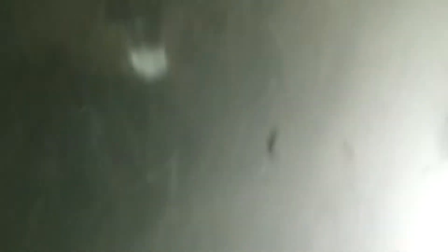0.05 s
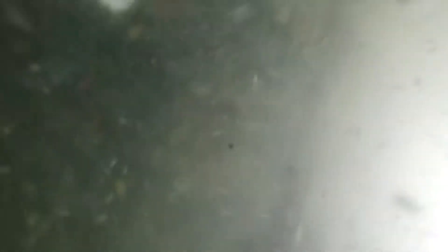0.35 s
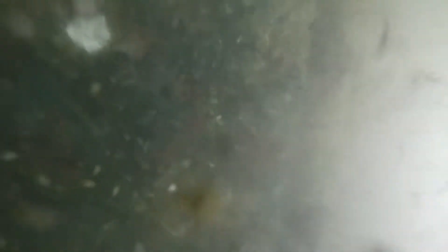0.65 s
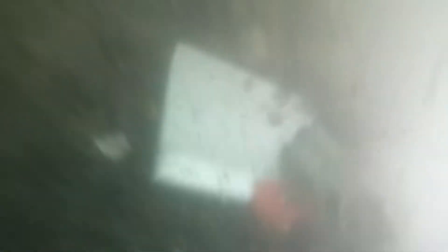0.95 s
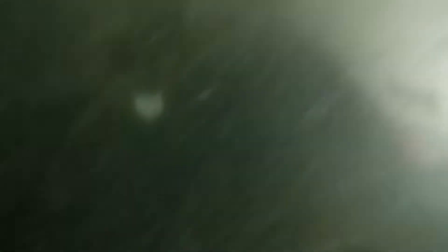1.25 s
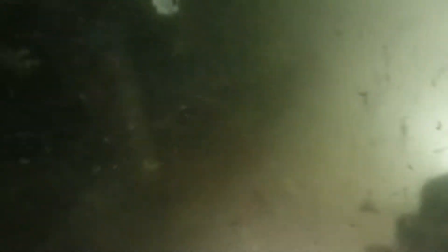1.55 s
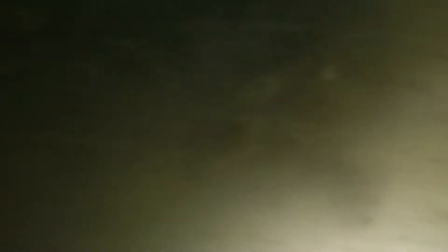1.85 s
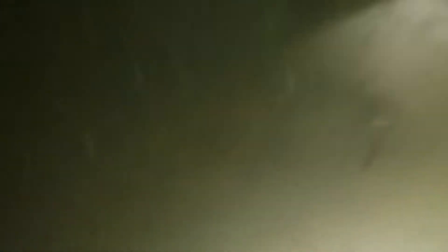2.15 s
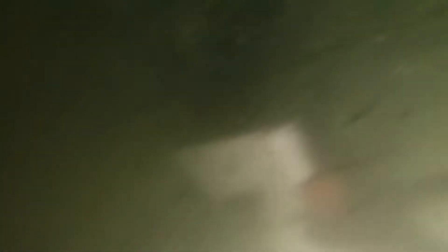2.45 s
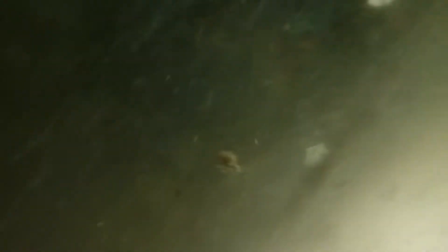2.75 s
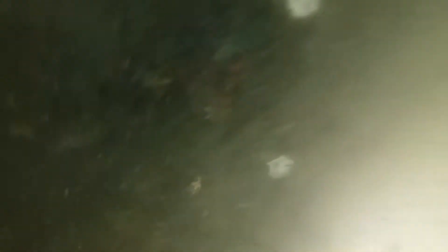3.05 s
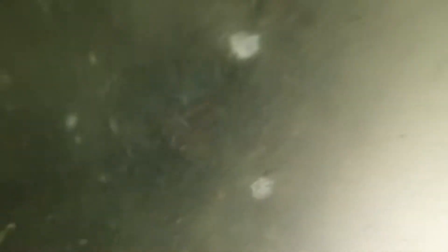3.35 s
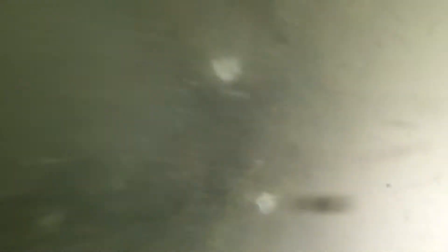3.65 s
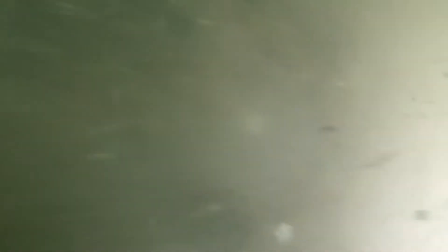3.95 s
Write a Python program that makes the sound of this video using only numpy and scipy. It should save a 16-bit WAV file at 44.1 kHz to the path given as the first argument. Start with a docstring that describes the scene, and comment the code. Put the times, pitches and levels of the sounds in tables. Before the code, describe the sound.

A scraper is pushed over a fouled boat hull underwater, close by, over continuous low churning and booming air pockets. From about 0.4 to 1 second the blade rasps and judders, snapping off shells with bright crackles. Loud hollow knocks ring the hull, thickest from 1.8 to 2.2 seconds. Weaker scrapes follow near 2.4 and 3.5 seconds, the last with a knock and a surge of water.

```python
"""Under water, a scraper is pushed over a fouled boat hull, close to a camera in a housing.
From the start water churns, air pockets boom and the hull judders. In the first second the blade
sticks and slips, rasping and cracking off shell growth. Knocks then ring the hull's modes, thickest
around 2 s, and two weaker strokes follow near 2.4 s and 3.5 s, the last with a surge of water.
Throughout, a limiter holds down the loudest blows."""
import sys
import numpy as np
from scipy import signal
from scipy.io import wavfile
from scipy.ndimage import uniform_filter1d, minimum_filter1d

SR = 44100
rng = np.random.default_rng(int(sys.argv[2]) if len(sys.argv) > 2 else 0)


def store_pcm(level_fs):
    """Save levels as 16-bit WAV."""
    pcm = np.round(np.clip(level_fs, -1, 1) * 32767).astype(np.int16)
    wavfile.write(sys.argv[1], SR, np.atleast_2d(pcm).T)


N = 176400
TIME = np.arange(N) / SR


def amp(db):
    """Decibels to amplitude ratio."""
    return 10 ** (np.asarray(db) / 20)


def unit(x):
    """Normalisation to rms 1."""
    return x / np.sqrt(np.mean(x ** 2) + 1e-20)


def add(mix, start_s, sound):
    """Superposition: a sound joins the mix at its start time."""
    part = mix[max(round(start_s * SR), 0):][:len(sound)]
    part += sound[:len(part)]


def level(rows, before_db=None):
    """Amplitude envelope, linear in decibels between points."""
    time_s, level_db = np.transpose(rows)
    return amp(np.interp(TIME, time_s, level_db, left=before_db))


def ring(spectrum, size=8192):
    """Minimum-phase impulse response: the Hilbert transform of log gain gives the phase."""
    hz, db = np.transpose(spectrum)
    bin_hz = abs(np.fft.fftfreq(size, 1 / SR)) + 1
    log_gain = np.log(amp(np.interp(np.log(bin_hz), np.log(hz), db)))
    response = np.fft.ifft(np.exp(np.conj(signal.hilbert(log_gain)))).real
    return response[:size // 2] * np.hanning(size)[size // 2:]


def through(x, response):
    """Convolution, cut to the scene's length."""
    return signal.fftconvolve(x, response)[:N]


def steady(x, span_s):
    """Division by the running rms evens the level and leaves faster detail."""
    window = signal.windows.hann(max(int(span_s * SR), 8))
    power = signal.fftconvolve(x ** 2, window, "same") / signal.fftconvolve(np.ones(N), window, "same")
    return x / np.sqrt(abs(power) + 1e-6 * np.mean(x ** 2))


def grains(per_s, spread_db):
    """Poisson process: independent impulses of random sign and size."""
    size = amp(spread_db * np.minimum(rng.exponential(1, N), 4))
    return size * rng.choice([-1., 1.], N) * (rng.random(N) < per_s / SR)


def scatter(x, wet_db, t60):
    """Reverberation: direct sound plus exponentially decaying reflections."""
    t = TIME[:SR // 4]
    tail = rng.standard_normal(len(t)) * amp(-60 * t / t60)
    return x + amp(wet_db) * through(x, tail / np.linalg.norm(tail))


def bubble(hz, db, t60, attack_s=0.00067, rise_per_s=0.46):
    """Bubble resonance: air is the spring and water the mass; the damped tone rises in pitch."""
    t = TIME[:SR // 3]
    envelope = 2 * amp(db - 60 * t / t60) * (1 - np.exp(-t / attack_s))
    return envelope * np.sin(2 * np.pi * hz * (t + rise_per_s * t ** 2 / 2))


def churn():
    """Shot noise: random gulps of churned water overlap into a low rumble."""
    # strength of the churning: time_s, level_db
    churning = [(0.01, -14.5), (0.09, -14), (0.36, -18), (0.4, -12.5), (0.96, -14.5), (0.98, -6.5),
                (1.05, -23.5), (1.14, -27), (1.17, -21), (1.31, -29), (1.36, -20.5), (1.53, -38),
                (1.71, -6.5), (1.98, -15), (2.14, -15.5), (2.65, -13.5), (2.81, -12.5), (3.14, -23),
                (3.47, -21), (3.51, -16), (3.77, -29), (3.99, -18)]
    # spectrum of one gulp: frequency_hz, gain_db
    spectrum = [(30, -17), (60, -10), (90, -3.5), (120, 2), (150, -0.5), (200, -6), (280, -23), (450, -43),
                (900, -89), (6000, -130)]
    gulps = through(grains(per_s=130, spread_db=-0.5), ring(spectrum))
    return amp(0.5) * level(churning) * steady(gulps, span_s=0.048)


def surge():
    """Flow noise: moving water puts slow pressure fluctuations on the housing."""
    # push of the water: time_s, level_db
    push = [(0.01, -31), (0.81, -27), (0.94, -20.5), (1.02, -36), (2.5, -30), (2.88, -40), (3.56, -30.5),
            (3.63, -18), (3.78, -27), (3.99, -18.5)]
    # pressure spectrum: frequency_hz, gain_db
    spectrum = [(3, -22), (10, 1), (22, -5.5), (48, 4.5), (70, -6), (130, -9), (400, -71), (4000, -130)]
    pressure = through(rng.standard_normal(N), ring(spectrum, size=32768))
    return amp(5) * level(push) * steady(pressure, span_s=0.095)


def background():
    """Amplitude-modulated noise: a rumble swells at random under a faint hiss."""
    # spectrum of the rumble: frequency_hz, gain_db
    rumble_spectrum = [(30, -8.5), (130, 11.5), (300, -22), (550, -21.5), (800, -43), (1400, -56),
                       (4000, -71.5)]
    # spectrum of the hiss: frequency_hz, gain_db
    hiss_spectrum = [(300, -4.5), (800, -0.5), (1400, -5.5), (2200, -7.5), (3000, -16), (4300, -16),
                     (5600, -12), (7000, -17), (8200, -12.5), (9200, -9.5), (10500, -16), (12500, -13.5),
                     (14000, -37)]
    # strength of the hiss: time_s, level_db
    hiss_levels = [(0, -9.5), (0.3, -3.5), (1.1, -6.5), (1.6, -3.5), (1.78, -4), (1.83, -8), (2.18, -8.5),
                   (2.24, -13.5), (2.35, -10), (2.6, -10.5), (2.85, -16.5), (3.2, -5), (3.7, -4), (4, -1)]
    swell_db = 3.5 * unit(through(rng.standard_normal(N), np.hanning(int(0.12 * SR))))
    rumble = unit(through(rng.standard_normal(N), ring(rumble_spectrum)) * amp(swell_db))
    hiss = unit(through(rng.standard_normal(N), ring(hiss_spectrum)))
    return amp(-34.5) * rumble + amp(-60) * level(hiss_levels) * hiss


def judder():
    """Forced vibration: uneven shoves of the blade make the hull thrum."""
    # strength of the juddering: time_s, level_db
    juddering = [(0, -24.5), (0.33, -29.5), (0.45, -21.5), (0.58, -16.5), (0.64, -24), (0.715, -12.5),
                 (0.82, -28.5), (0.975, -14), (1.07, -43), (1.25, -37), (1.31, -42), (1.365, -26),
                 (1.42, -42), (1.6, -34.5), (1.71, -24), (1.78, -18), (1.83, -18), (1.88, -12), (1.95, -14),
                 (2.03, -26.5), (2.08, -33), (2.11, -24.5), (2.21, -18.5), (2.26, -25.5), (2.37, -27),
                 (2.42, -19), (2.48, -36), (2.63, -19), (2.71, -36.5), (2.9, -28.5), (3.15, -38),
                 (3.42, -35), (3.53, -23.5), (3.6, -37), (3.8, -47.5), (3.89, -25.5), (4, -46)]
    # response of the hull: frequency_hz, gain_db
    hull = [(90, -29.5), (170, -9.5), (240, 7), (315, -1.5), (390, -7.5), (490, -13), (540, -25),
            (680, -26.5), (800, -56.5), (1300, -54.5), (2500, -83), (9000, -125)]
    shoves = scatter(grains(per_s=190, spread_db=-0.5), wet_db=-9, t60=0.45)
    return amp(1) * level(juddering) * steady(through(shoves, ring(hull)), span_s=0.076)


def gurgle():
    """Resonance in a random swarm of tiny bubbles: the smaller ring higher, shorter and weaker."""
    # strength of the swarm: time_s, level_db
    gurgling = [(0, -41), (0.25, -48), (0.45, -43), (0.56, -32), (0.66, -39), (0.9, -47), (1.1, -62),
                (1.75, -58), (1.9, -39), (2.03, -58), (2.3, -53), (2.6, -46), (2.75, -56), (2.95, -51),
                (3.15, -60), (3.52, -43), (3.6, -58), (3.65, -49), (3.78, -68), (3.9, -44), (4, -45)]
    low_hz, high_hz, db_per_octave, decay_cycles = 460, 720, -9, 18
    swarm = np.zeros(N)
    for hz in np.geomspace(low_hz, high_hz, num=16):
        blip = bubble(hz, db_per_octave * np.log2(hz / low_hz), t60=decay_cycles / hz)
        swarm += through(grains(per_s=40, spread_db=7.5), blip)
    return level(gurgling) * steady(swarm, span_s=0.45)


def booms():
    """Volume pulsation: large air pockets resonate at low pitch."""
    # air pockets: start_s, pitch_hz, level_db
    pockets = [(0.03, 129.8, -9), (0.392, 117, -7), (0.706, 150, -6.5), (0.922, 84, -10.5),
               (1.16, 102, -12.5), (1.627, 219, -12.5), (1.655, 171, -9.5), (1.692, 119, -0.5),
               (1.71, 298, -15.5), (1.782, 105, -6.5), (1.98, 73.7, -9), (2.04, 69.3, -4),
               (2.096, 105.5, -8.5), (2.133, 136.7, -6.5), (2.179, 95.4, -4), (2.243, 83.5, -2.5),
               (2.325, 107.7, -5.5), (2.417, 111.6, -11.5), (2.72, 147.4, -6.5), (2.788, 131.9, -3.5),
               (2.884, 131.4, -5.5), (3, 121.5, -10.5), (3.944, 56.2, -12)]
    out = np.zeros(N)
    for start_s, hz, db in pockets:
        add(out, start_s, bubble(hz, db - 0.5, t60=0.2, attack_s=0.0079, rise_per_s=0.9))
    return out


def rasps():
    """Stick-slip friction: quick slips ring two damped resonances, tuned by the grip of each bite."""
    # bites of the blade: middle_s, length_s, resonance_hz, level_db
    bites = [(0.164, 0.23, 590, -42.5), (0.502, 0.1, 640, -33.5), (0.566, 0.093, 654, -29.5),
             (0.717, 0.084, 680, -37), (1.877, 0.049, 740, -37.5), (2.405, 0.056, 890, -44.5),
             (2.578, 0.095, 623, -35.5), (3.51, 0.028, 612, -32), (3.94, 0.11, 470, -33)]
    width_hz, upper_ratio, upper_db = 230, 1.4, -17
    out, t = np.zeros(N), TIME[:SR // 50]
    for middle_s, length_s, hz, db in bites:
        pair = np.sin(2 * np.pi * hz * t) + amp(upper_db) * np.sin(2 * np.pi * hz * upper_ratio * t)
        response = t ** 2 * np.exp(-np.pi * width_hz * t) * pair
        slips = grains(per_s=760, spread_db=3.5)[:int(length_s * SR)]
        rasp = signal.fftconvolve(slips, response, "same")
        fade = np.hanning(len(rasp))
        add(out, middle_s - length_s / 2, amp(db) * np.sqrt(np.mean(fade ** 2)) * unit(fade * rasp))
    return out


def shell_ring():
    """Impulse response of a fracture: a bright crack and the thin modes of the metal blade."""
    # spectrum of breaking shell: frequency_hz, gain_db
    spectrum = [(1500, -35), (3600, -30), (4600, -31), (5650, -20), (6050, -21.5), (6400, -19), (6950, -23),
                (7850, -8), (8200, -10.5), (8850, -4), (9220, -3), (9400, -2), (9600, -0.5), (9950, -3.5),
                (10400, -12), (12300, -16.5), (13500, -24), (16000, -24.5)]
    blade_hz, blade_db, blade_t60 = (7800, 9200, 9580, 9900), -31, 0.03
    crack = ring(spectrum)
    t = TIME[:len(crack)]
    blade = sum(np.sin(2 * np.pi * hz * t) for hz in blade_hz) * amp(blade_db - 60 * t / blade_t60)
    return crack / abs(crack).max() + blade


def scraping():
    """Brittle fracture: the blade catches and slips, shedding grains that clump more when loud."""
    # bright crackle of shell, stroke by stroke: time_s, level_db
    strokes = [(0.1, -89), (0.16, -71.5), (0.33, -70), (0.42, -48.5), (0.45, -57), (0.54, -48.5),
               (0.585, -43.5), (0.645, -51), (0.69, -38.5), (0.735, -49), (0.775, -39.5), (0.81, -55),
               (0.87, -55.5), (0.90, -47.5), (0.97, -47), (1.02, -61.5), (1.10, -76), (1.15, -71.5),
               (2.24, -88.5), (2.33, -64), (2.355, -55.5), (2.372, -43.5), (2.40, -54.5), (2.465, -72.5),
               (2.51, -60.5), (2.62, -56.5), (2.68, -57.5), (2.76, -84), (3.1, -83.5), (3.33, -69.5),
               (3.37, -62), (3.41, -62), (3.48, -53.5), (3.558, -59.5), (3.572, -72), (3.78, -71),
               (3.9, -61), (3.99, -62)]
    # coarse crunch of the growth: time_s, level_db
    crunch_levels = [(0.28, -74), (0.4, -58), (0.55, -51.5), (0.63, -57), (0.68, -47.5), (0.75, -59),
                     (0.83, -62), (0.93, -57.5), (0.98, -50), (1.04, -71), (1.34, -86), (1.353, -54),
                     (1.39, -86), (1.68, -64.5), (1.78, -56), (1.845, -74), (1.857, -54), (1.93, -64.5),
                     (2.0, -84.5), (2.08, -68), (2.12, -61), (2.2, -58.5), (2.24, -83.5), (2.32, -64.5),
                     (2.40, -56.5), (2.47, -70), (2.59, -57), (2.7, -68.5), (2.9, -65.5), (3.15, -87.5),
                     (3.38, -69), (3.54, -57.5), (3.59, -71), (3.82, -75.5), (3.95, -70)]
    # spectrum of the crunch: frequency_hz, gain_db
    crunch_spectrum = [(300, -3), (600, -15.5), (850, 1.5), (1000, -3.5), (1220, -1), (1450, -19.5),
                       (2000, -15), (2400, -19.5), (2900, -19), (4200, -23), (7000, -27.5)]
    quiet_db, loud_db, quiet_cutoff_hz = -60, -39.5, 10130
    # One random grip bunches both kinds of grain into clumps.
    grip = unit(through(rng.standard_normal(N), signal.windows.hann(260)))
    loudness = np.interp(20 * np.log10(level(strokes)), [quiet_db, loud_db], [0, 1])
    fine = grains(per_s=7900, spread_db=4.2) * amp((2 + 3.9 * loudness) * grip)
    coarse = grains(per_s=1600, spread_db=4) * amp(3 * grip)
    crackle = steady(through(scatter(fine, wet_db=-9, t60=0.039), shell_ring()), span_s=0.069)
    dull = signal.sosfiltfilt(signal.butter(4, quiet_cutoff_hz, fs=SR, output="sos"), crackle)
    crackle = dull + loudness * (crackle - dull)  # the top is dulled when quiet
    crunch = steady(through(scatter(coarse, wet_db=-7, t60=0.027), ring(crunch_spectrum)), span_s=0.41)
    return (amp(4.5) * level(strokes, before_db=-np.inf) * crackle
            + amp(7) * level(crunch_levels, before_db=-np.inf) * crunch)


def blips():
    """Free oscillation: single small bubbles ring briefly."""
    # small bubbles: start_s, pitch_hz, level_db
    singles = [(0.285, 860, -45), (0.339, 1030, -40), (1.245, 440, -39), (1.447, 540, -35),
               (1.553, 380, -32), (2.975, 1010, -48), (3.078, 860, -48)]
    out = np.zeros(N)
    for start_s, hz, db in singles:
        add(out, start_s, bubble(hz, db, t60=0.037))
    return out


def snaps():
    """Sudden release of strain: larger shells break with a bright click."""
    # shells snapping off: start_s, level_db
    breaks = [(0.564, -31), (0.5733, -29.5), (0.603, -26.5), (0.628, -28.5), (0.6938, -34), (0.7068, -28),
              (0.7632, -18.5), (0.771, -26), (0.782, -36), (0.79, -25), (0.83, -27.5), (0.8851, -25),
              (0.932, -27.5), (0.94, -29), (0.9718, -26.5), (1.0004, -40), (1.0565, -34), (1.224, -46),
              (1.3482, -41), (1.3571, -37.5), (1.758, -41), (1.778, -42.5), (1.8, -48), (1.8526, -47),
              (1.865, -41.5), (1.875, -42), (1.9335, -40), (2.145, -41), (2.164, -47), (2.2064, -41),
              (2.368, -30), (2.382, -32), (2.414, -39.5), (2.44, -48.5), (2.613, -40.5), (3.484, -35.5),
              (3.5382, -36.5), (3.551, -38.5), (3.5566, -42)]
    clicks, shell = np.zeros(N), shell_ring()
    for start_s, db in breaks:
        add(clicks, start_s + 0.0025, amp([db + 3.5]))
    return through(scatter(clicks, wet_db=-2, t60=0.022), shell / abs(shell).max())


def overload_ticks():
    """Overload crackle: short dull ticks, placed mostly on the loudest knocks and booms."""
    # ticks of overload crackle: start_s, level_db
    overloads = [(0.6649, -43), (1.703, -44), (1.813, -39.5), (1.854, -48.5), (1.860, -50.5), (1.891, -44),
                 (2.096, -51.5), (2.21, -43.5), (2.216, -47.5), (2.3396, -57.5), (2.722, -54.5),
                 (2.7876, -58), (2.807, -54), (2.827, -53), (2.886, -55)]
    # spectrum of one tick: frequency_hz, gain_db
    spectrum = [(500, -1), (1300, 3.5), (2000, 2), (3000, -7), (4200, -14), (6000, -29), (10000, -50)]
    clicks, tick = np.zeros(N), ring(spectrum)
    for start_s, db in overloads:
        add(clicks, start_s, amp([db + 10.5]))
    return through(scatter(clicks, wet_db=-2.5, t60=0.017), tick / abs(tick).max())


def knocks():
    """Modal ringing: each blow sounds the struck spot, the hull and a plate tone under a dull tick."""
    # blade striking the hull: start_s, thud_db, spot_hz, tick_db, plate_db
    blows = [(0.709, -5.5, 246, -47, -48), (0.972, -6, 328, -31, -49.5), (0.985, 0, 209, -50, -59),
             (1.021, -20.5, 289, -30, -63.5), (1.352, -15.5, 309, -46, -55.5),
             (1.552, -16.5, 324.5, -54, -55.5), (1.756, -20, 300, -25.5, -53.5),
             (1.806, 5, 323, -16.5, -18.5), (1.851, -9, 346, -12, -21), (1.874, 0, 302, -22, -22.5),
             (1.887, -8.5, 355, -17.5, -23), (1.912, -1.5, 327, -23.5, -35.5), (1.936, -1, 352.5, -29, -27),
             (1.971, -3.5, 323, -44.5, -30.5), (2.058, -10, 299, -34.5, -33.5),
             (2.097, 1, 292.4, -47, -22.5), (2.146, 1.5, 323, -39.5, -20.5), (2.206, 6, 304, -31, -20),
             (2.407, -7, 353, -45, -43), (2.612, -12.5, 320, -46, -30), (3.238, -11.5, 293, -26.5, -53.5),
             (3.508, -0.5, 274, -32, -27.5), (3.55, -17, 338, -29.5, -37), (3.892, -21, 330, -54, -28.5)]
    # modes of the hull: pitch_hz, level_db, t60_s
    hull_modes = [(121, -10.5, 0.18), (246, -15, 0.057), (294.6, -10.5, 0.2), (367, -13, 0.051),
                  (486, -14.5, 0.055), (640.5, -24.5, .05), (1010, -37.5, 0.04)]
    # spectrum of the tick: frequency_hz, gain_db
    tick_spectrum = [(200, 9), (600, 20), (1200, 1), (2100, -17.5), (3000, -35.5), (6000, -54),
                     (12000, -75.5)]
    spot_db, spot_t60, plate_hz, plate_t60 = 5, 0.074, 485.7, 0.26
    out, ticks, t, tick = np.zeros(N), np.zeros(N), TIME[:SR // 2], ring(tick_spectrum)
    hz, db, t60 = np.transpose(hull_modes)[:, :, None]
    attack = 1 - np.exp(-(t / 0.0032) ** 2)
    for start_s, thud_db, spot_hz, tick_db, plate_db in blows:
        strength, detune = rng.standard_normal((2, len(hz), 1))  # no two blows ring alike
        modes = amp(db + 2 * strength - 60 * t / t60) * np.sin(2 * np.pi * hz * (1 + 0.0056 * detune) * t)
        spot = amp(spot_db - 60 * t / spot_t60) * np.sin(2 * np.pi * spot_hz * t)
        thud = amp(thud_db - 7) * (spot + modes.sum(0))
        detuned_hz = plate_hz * (1 + 0.018 * detune[0])
        plate = amp(plate_db - 60 * t / plate_t60) * np.sin(2 * np.pi * detuned_hz * t)
        add(out, start_s, (thud + plate) * attack)
        add(ticks, start_s + 0.0053, amp(tick_db) * tick / abs(tick).max())
    return out + scatter(ticks, wet_db=-6.5, t60=0.033)


def scene():
    """Superposition of all sources at one microphone."""
    scraper = scraping() + rasps() + judder() + knocks() + snaps()
    ticks = overload_ticks()
    water = blips() + booms() + gurgle() + churn() + surge() + background()
    return (scraper + ticks + water)[None]


def record(dry):
    """Peak limiting: gain drops just ahead of a peak and recovers slowly; a low-pass follows."""
    ceiling, recover_db_per_s, lookahead_s, edge_hz = 0.9, 33.5, 0.003, 15200
    over_db = np.maximum(20 * np.log10(abs(dry[0]) / ceiling + 1e-9), 0)
    recovery_db, ahead = TIME * recover_db_per_s, int(lookahead_s * SR)
    gain_db = minimum_filter1d(recovery_db - np.maximum.accumulate(over_db + recovery_db), 2 * ahead)
    gain_db = uniform_filter1d(uniform_filter1d(gain_db, ahead), ahead)
    lowpass = signal.firwin(511, edge_hz, window=("kaiser", 9), fs=SR)
    return signal.oaconvolve(dry * amp(gain_db), lowpass[None], "same")


dry = scene()
out = record(dry)
store_pcm(out)
```